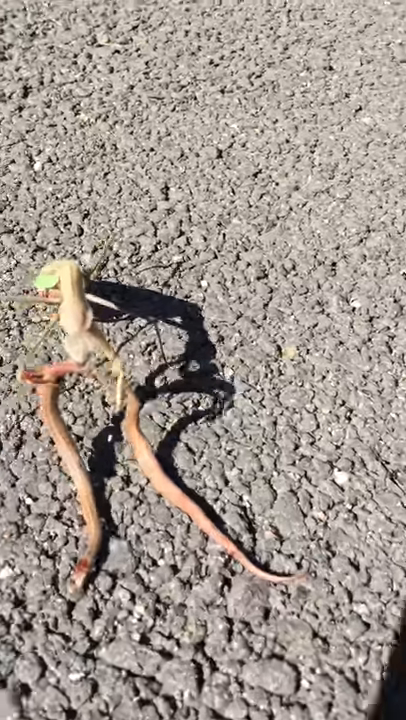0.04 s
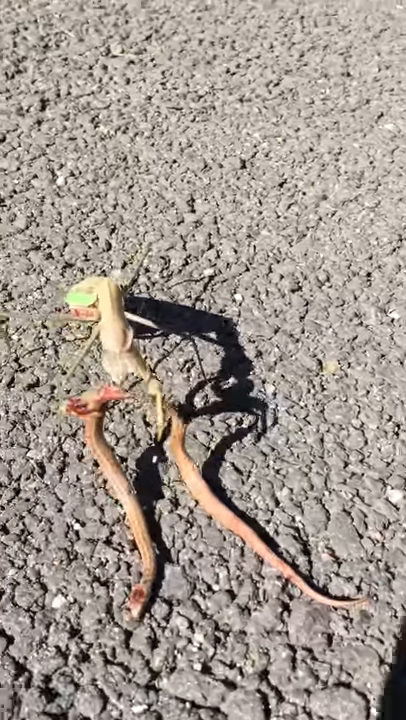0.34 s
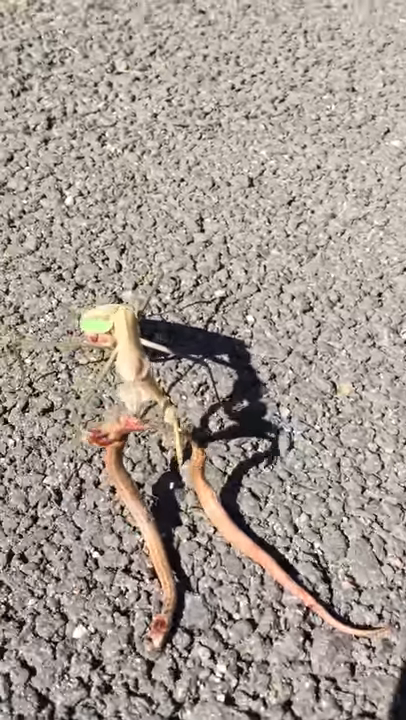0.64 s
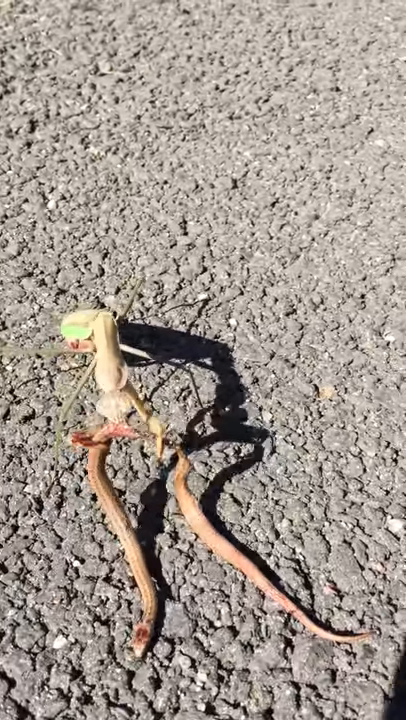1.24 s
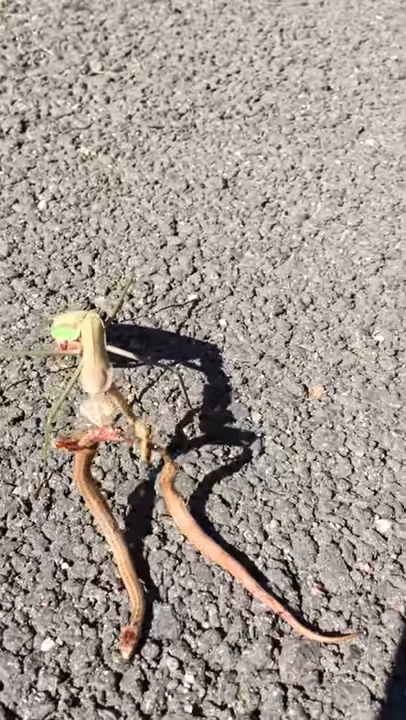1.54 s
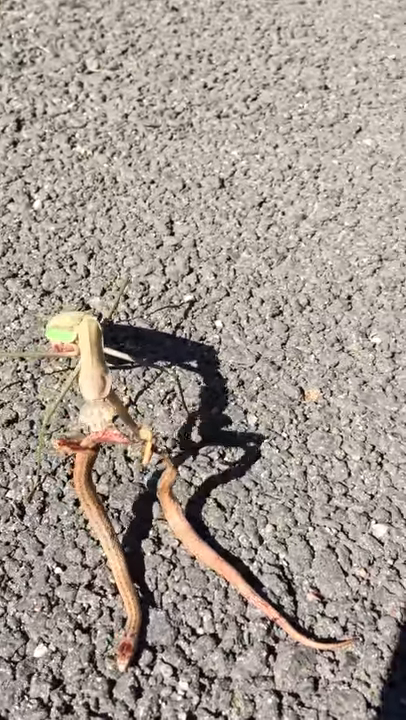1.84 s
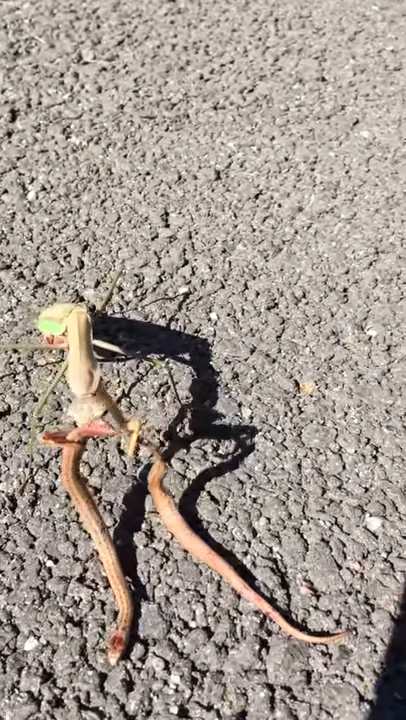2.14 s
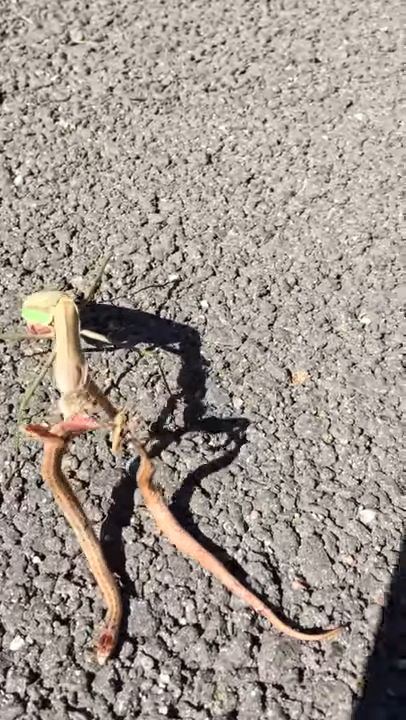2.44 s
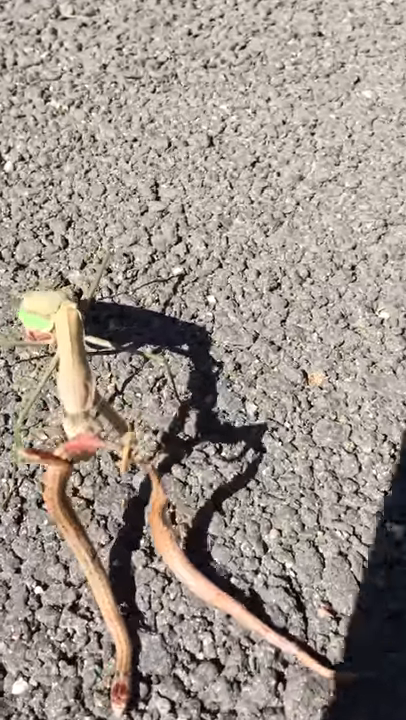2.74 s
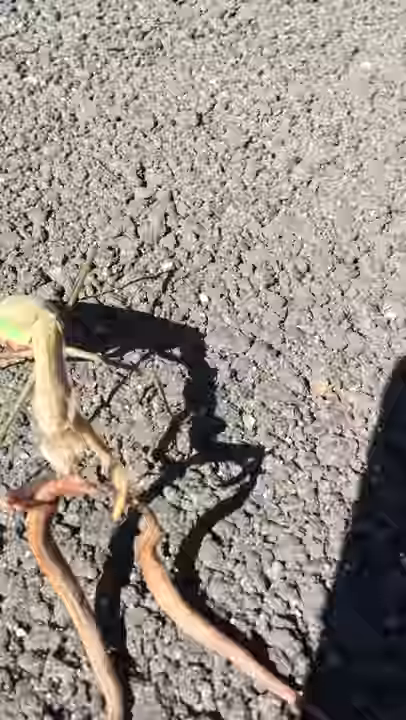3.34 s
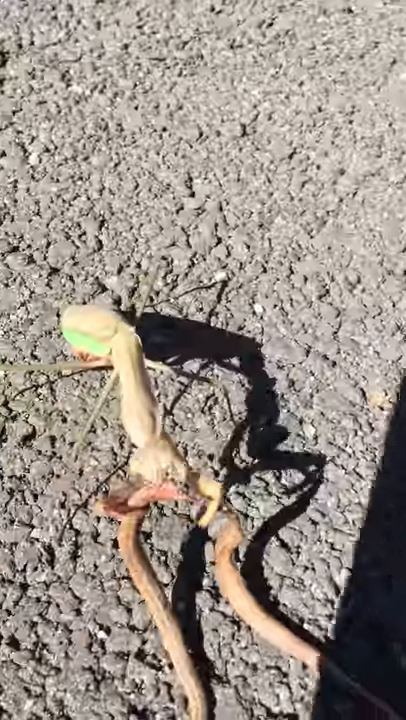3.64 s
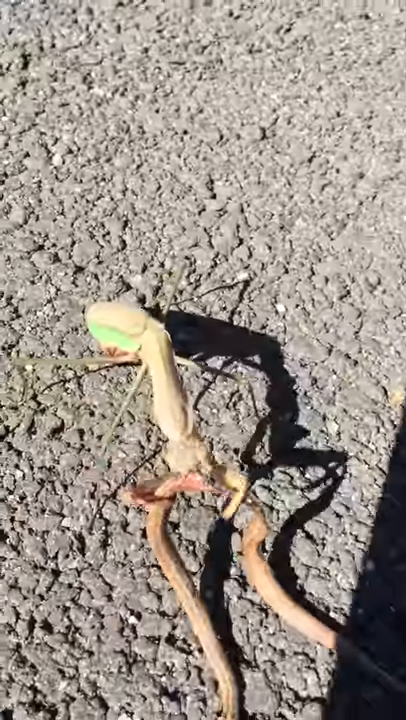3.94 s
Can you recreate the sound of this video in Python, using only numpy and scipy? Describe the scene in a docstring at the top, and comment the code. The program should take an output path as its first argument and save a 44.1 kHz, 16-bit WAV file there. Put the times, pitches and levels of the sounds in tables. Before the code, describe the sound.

Insects buzz steadily outdoors, one cricket nearest, over a low engine idle and machine hum. Light wind bumps the microphone, something clacks once and rustles, and the hum swells then sinks. Faint birds whistle far away.

```python
"""Beside sunny asphalt, insects buzz with their wing strokes throughout, one cricket nearest the microphone,
over a low engine idle and a machine hum. Far birds whistle from the start. About a second in, the
microphone moves, light wind starts to bump it and a few small taps begin. At 1.4 s something clacks once,
rings and rustles away. The hum swells until nearly 3 s, then sinks back under the insects."""
import sys
import numpy as np
from scipy import signal
from scipy.fft import rfft, irfft
from scipy.io import wavfile
from scipy.ndimage import uniform_filter1d

SR = 44100
rng = np.random.default_rng(int(sys.argv[2]) if len(sys.argv) > 2 else 0)


def wav_out(sig):
    """Save sig, one row per channel (or a flat mono array), as 16-bit PCM at SR to the path in sys.argv[1]."""
    wavfile.write(sys.argv[1], SR, np.round(np.clip(np.atleast_2d(sig).T, -1, 1) * 32767).astype(np.int16))


N = 176400

# Rise and fall of all the insects together. Each row: time in seconds, gain in dB.
CHORUS_SWELL = [(0, 0.5), (.6, -1), (.8, 1.5), (1.7, 0.7), (2.6, -0.5), (3.2, -1.5), (4, -1)]


def amp(db):
    """Decibels to gain."""
    return 10 ** (np.asarray(db) / 20)


def unit(x):
    """Scales to rms 1."""
    return x / np.sqrt(np.mean(x ** 2) + 1e-20)


def clock():
    """Time of each sample in seconds."""
    return np.arange(N) / SR


def curve(rows):
    """Each column of a time table, joined by straight lines."""
    times, *columns = np.transpose(rows)
    return [np.interp(clock(), times, column) for column in columns]


def noise(shape):
    """Noise of rms 1, its spectrum shaped by a function of frequency."""
    gain = shape(np.fft.rfftfreq(N, 1 / SR))
    return unit(irfft(rfft(rng.standard_normal(N)) * gain, N))


def coloured(spectrum):
    """Noise of rms 1 that follows a spectrum table."""
    hz, db = np.transpose(spectrum)
    return noise(lambda f: amp(np.interp(np.log(f + 1), np.log(hz + 1), db)))


def drift(rate_hz):
    """Smooth random wander, up to about the given rate."""
    return noise(lambda f: np.exp(-(f / rate_hz) ** 2) * (f > 0))


def blurred(hz, width_hz):
    """A tone smeared by many voices or echoes; it can follow a pitch curve."""
    phase = 2 * np.pi * np.cumsum(hz * np.ones(N)) / SR
    a, b = (noise(lambda f: 1 / (1 + (2 * f / width_hz) ** 2)) for _ in range(2))
    return unit(a * np.cos(phase) + b * np.sin(phase))


def dying(start, t60, rise_s):
    """A quick rise, and a decay of 60 dB in t60 seconds."""
    age = np.maximum(clock() - start, 0)
    return np.minimum(age / rise_s, 1) * np.exp(-np.log(1000) * age / t60)


def puffs(rows):
    """Gain curve of a few bell-shaped puffs."""
    return sum(amp(db) * np.exp(-((clock() - centre) / half) ** 2) for centre, half, db in rows)


def air():
    """Distant outdoor wash and a midrange rush that swells and fades, both in drifting patches."""
    # Each row of both: frequency in Hz, relative density in dB.
    wash_spectrum = [(15, -39), (30, -16.5), (45, 1.5), (90, -6), (130, 0.5), (230, -2.5), (290, -11),
                     (380, -13), (470, -18), (900, -24.5), (1500, -26), (1950, -28.5), (2900, -32.5),
                     (3900, -30.5), (4900, -37.5), (6000, -36.5), (8500, -40.5), (9900, -42), (10400, -47),
                     (11200, -42.5), (15500, -45)]
    rush_spectrum = [(200, -9), (450, -5.5), (700, 5.5), (980, 7.5), (1180, -1.5), (1420, 3.5),
                     (1900, -10.5), (3000, -16.5), (6000, -29)]
    # Each row: time in seconds, level in dB.
    rush_levels = [(0, -75.5), (.8, -76), (1.1, -68.5), (1.25, -71), (1.6, -68), (2.1, -70.5), (2.8, -71.5),
                   (3.1, -76), (4, -78.5)]
    wash = amp(-57.5) * coloured(wash_spectrum)
    rush = amp(curve(rush_levels)[0]) * coloured(rush_spectrum)
    hz, _, frames = signal.stft(wash + rush, SR, nperseg=1024, noverlap=768)
    patches = uniform_filter1d(rng.standard_normal(frames.shape), size=8, axis=0)  # across frequency
    patches = unit(uniform_filter1d(patches, size=10, axis=1))  # across time
    patch_db = 2.5 * patches / (1 + hz[:, None] / 3000)
    return signal.istft(frames * amp(patch_db), SR, nperseg=1024, noverlap=768)[1][:N]


def wind():
    """Short puffs of light wind buffet the microphone."""
    # Each row: centre in seconds, half length in seconds, level in dB.
    gusts = [(1.05, 0.036, -43), (1.695, 0.035, -41.5), (1.758, 0.028, -37), (1.96, 0.024, -47.5)]
    # Each row: frequency in Hz, relative density in dB.
    eddy_spectrum = [(12, -50), (27, -30), (38, -9.5), (60, 9), (78, -2), (130, -11.5), (250, -34),
                     (600, -83)]
    eddies = coloured(eddy_spectrum)
    local_rms = np.sqrt(uniform_filter1d(eddies ** 2, size=2000) + 1e-6)
    return puffs(gusts) * eddies / local_rms


def swells():
    """The low midrange swells briefly now and then."""
    # Each row: centre in seconds, half length in seconds, level in dB.
    rises = [(.33, 0.066, -60), (1.94, 0.022, -71.5), (3.76, 0.067, -66)]
    # Each row: frequency in Hz, relative density in dB.
    spectrum = [(120, -20), (250, -7), (360, 4), (450, -7), (700, -25.5), (1500, -18), (4000, -44)]
    return puffs(rises) * coloured(spectrum)


def birds():
    """Thin gliding whistles, smeared by distance."""
    # Each row: start and length in seconds, first and last pitch in Hz, level midway in dB,
    # blur width in Hz, swell from start to end in dB.
    whistles = [(0.172, 0.16, 4500, 4530, -78, 240, -7), (0.285, .32, 2720, 2630, -78, 450, 9),
                (1.05, 0.14, 3730, 3600, -74, 89.5, 26), (1.19, 0.28, 3540, 3240, -69.5, 91, 2),
                (1.973, 0.15, 2150, 2254, -76.5, 200, 4), (2.078, 0.096, 2330, 2310, -63, 69, 7),
                (2.193, 0.026, 2320, 2362, -72, 60, -3), (2.656, 0.17, 4492, 4600, -76, 150, -2),
                (3.433, 0.24, 1647, 1674, -75.5, 320, -2), (3.82, .23, 3730, 3352, -72.5, 100.6, 16)]
    out = np.zeros(N)
    for start, length, from_hz, to_hz, db, width, swell_db in whistles:
        progress = np.clip((clock() - start) / length, 0, 1)
        arch = 2 * np.sqrt(progress * (1 - progress))
        tone = blurred(from_hz + (to_hz - from_hz) * progress, width)
        out += amp(db + swell_db * (progress - .5)) * arch * tone
    return out


def hum():
    """A machine's clean hum swells and fades under weak wavering overtones."""
    # Each row: time in seconds, pitch in Hz, level in dB.
    fundamental = [(0, 119.8, -56.5), (.35, 119.6, -63.5), (.6, 119.4, -56.5), (1, 119.3, -52.5),
                   (1.2, 119.2, -53), (1.4, 119.2, -49.5), (1.8, 118.8, -46), (2, 118.3, -47.5),
                   (2.3, 118.2, -44.5), (2.6, 118.4, -45), (2.86, 118.6, -43), (2.96, 118.7, -48),
                   (3.6, 119.2, -49), (4, 119.5, -53.5)]
    # Each row: multiple of the pitch, average level in dB.
    overtones = [(2, -65.5), (3, -73.5), (5, -83)]
    hz, db = curve(fundamental)
    phase = 2 * np.pi * np.cumsum(hz) / SR
    out = amp(db) * np.sin(phase)
    for multiple, overtone_db in overtones:
        gain = amp(overtone_db + 2.04 * drift(2.2))
        out += gain * np.sin(multiple * phase + 0.57 * drift(18))
    return np.sqrt(2) * out


def engine():
    """Low partials of an uneven idle; their balance shifts as the microphone moves."""
    # Each row: time in seconds, firings per second, overall gain in dB.
    idle = [(0, 27.5, -1), (.8, 29.9, -1), (1.3, 28.7, -2.5), (2.1, 28.8, 0.5), (2.75, 29.1, 2.5),
            (3.05, 29.2, -3), (4, 30.7, -3)]
    # Each row: multiple of the firing rate, base level in dB before the move and after it.
    partials = [(2, -52, -56.5), (3, -54, -62.5), (5, -59.5, -56.5), (6, -56, -60.5), (7, -61, -68.5),
                (8, -63.5, -67.5), (9, -75.5, -85), (13, -82, -79)]
    move_start_s, move_end_s, waver_db, wobble_cycles = .7, 1.7, 1.9, .025
    rate, gain_db = curve(idle)
    firings = np.cumsum(rate) / SR
    out = np.zeros(N)
    for multiple, before_db, after_db in partials:
        db = np.interp(clock(), [move_start_s, move_end_s], [before_db, after_db]) + waver_db * drift(8.8)
        cycles = multiple * firings + wobble_cycles * drift(28) + rng.random()
        out += amp(db) * np.sin(2 * np.pi * cycles)
    return np.sqrt(2) * amp(gain_db) * out


def ticks():
    """Small taps that ring briefly."""
    # Each row: start in seconds, pitch in Hz, level in dB, t60 in seconds.
    taps = [(2.4258, 2255, -51, .03), (2.4262, 1399, -61, 0.034), (1.131, 1275, -59, 0.089),
            (1.143, 634, -59, 0.068), (1.539, 1390, -61, 0.067), (2.163, 940, -56, 0.058),
            (2.941, 1480, -63, .03)]
    return sum(amp(db) * dying(start, t60, rise_s=.001) * np.sin(2 * np.pi * hz * (clock() - start))
               for start, hz, db, t60 in taps)


def clack():
    """A sharp blow rings an object's modes; its aftershocks trail off into a grainy rustle."""
    # The blow, then its aftershocks. Each row: start in seconds, level in dB.
    hits = [(1.382, -50.5), (1.394, -66), (1.407, -58.5), (1.427, -63), (1.442, -62)]
    # Each row: frequency in Hz, relative density in dB.
    spectrum = [(200, -13), (550, -1), (750, -17), (1150, -2), (1380, 6), (1800, -4), (2400, -4),
                (2900, 6.5), (3400, 1), (3950, 3), (4400, -8), (5600, -7.5), (6800, -12), (8500, -32),
                (15000, -37)]
    # Each row: pitch in Hz, relative level in dB, t60 in seconds.
    modes = [(572, 7.5, 0.084), (1350, 7.5, 0.27), (1555, -15, .2), (2870, -8, 0.42), (2996, -7, 0.41),
             (3100, -3, .25), (3140, -14, 0.32), (3500, -7, 0.78), (3625, -10, .2), (3935, 1, 0.21),
             (5180, -4, 0.31)]
    start = hits[0][0]
    blow_gain = sum(amp(db) * dying(at, t60=0.062, rise_s=0.00059) for at, db in hits)
    rustle_gain = amp(-57 + 1.5 * drift(200)) * dying(start, t60=0.51, rise_s=0.01)
    ring = np.zeros(N)
    for hz, db, t60 in modes:
        tone = np.sin(2 * np.pi * (hz * clock() + rng.random()))
        ring += amp(db - 65) * dying(start, t60, rise_s=0.0012) * tone
    return ring + blow_gain * coloured(spectrum) + rustle_gain * coloured(spectrum)


def insects():
    """The far chorus: each kind rings in its own band, pulsed by its wing strokes."""
    # Each row: centre and width in Hz, base level in dB, strokes per second, pulse depth from 0 to 1.
    bands = [(6950, 800, -73.5, 28.4, 0.08), (7685, 690, -77, 59, 0.18), (4233, 440, -78.5, 34, 0.13)]
    waver_db, jitter = 1, 0.0032
    out = np.zeros(N)
    for hz, width, db, rate, depth in bands:
        strokes = np.cumsum(rate * (1 + jitter * drift(2.1))) / SR
        pulses = 1 + depth * (2 * np.cos(np.pi * strokes) ** 4 - 1)
        out += amp(db + waver_db * drift(15)) * unit(blurred(hz, width) * pulses)
    return out * amp(curve(CHORUS_SWELL)[0])


def cricket():
    """The cricket nearest the microphone trills: one tone pulse per wing stroke."""
    strokes_per_s, jitter, base_db = 39.7, .003, -77
    strokes = np.cumsum(strokes_per_s * (1 + jitter * drift(2.2))) / SR
    pulses = np.cos(np.pi * strokes) ** 2
    trill = unit(pulses * blurred(hz=7025, width_hz=56))
    return amp(base_db + curve(CHORUS_SWELL)[0]) * trill


def scene():
    """All sources at one microphone beside the asphalt."""
    mix = insects() + cricket() + engine() + hum() + air() + wind() + swells() + birds() + clack() + ticks()
    return mix[None]


def record(dry):
    """The recorder cuts off the highest treble."""
    edge_hz = 15720
    lowpass = signal.firwin(511, edge_hz, window=("kaiser", 9), fs=SR)
    return signal.oaconvolve(dry, lowpass[None], "same")


dry = scene()
out = record(dry)
wav_out(out)
```